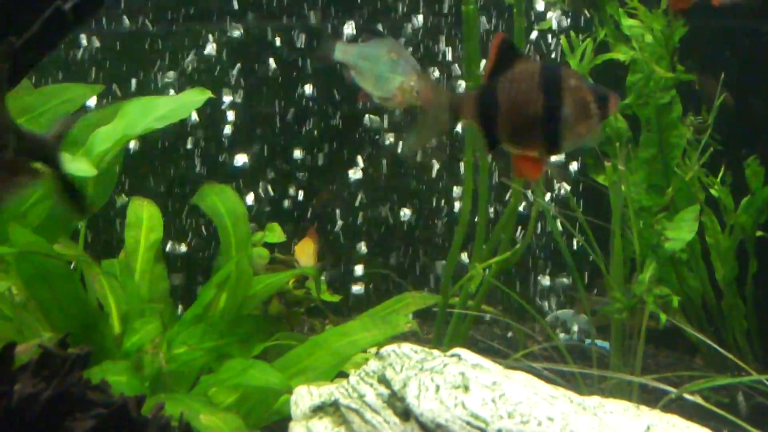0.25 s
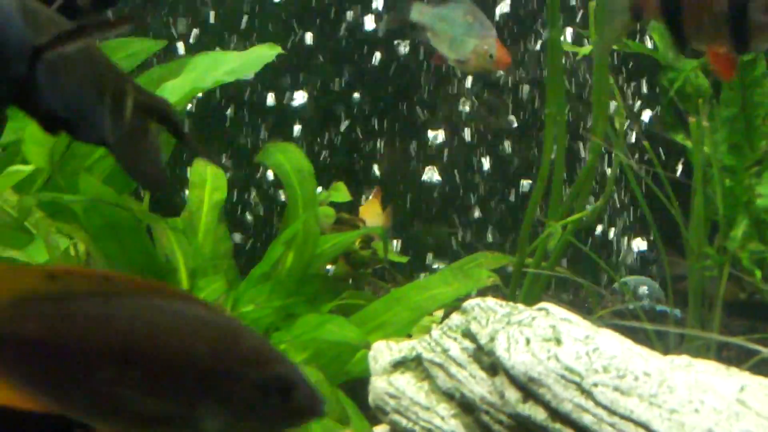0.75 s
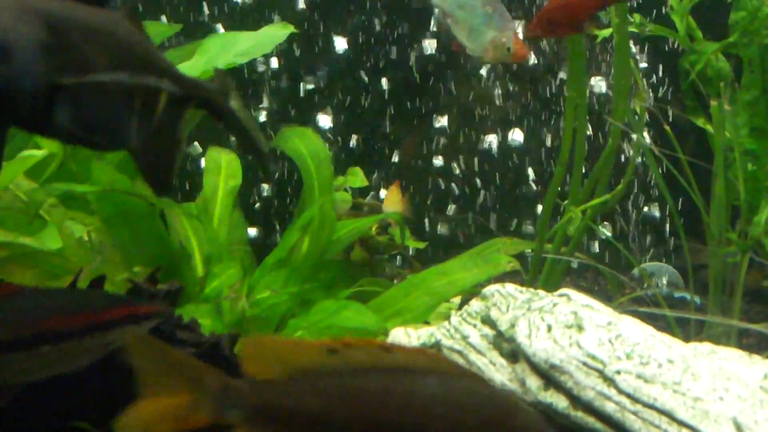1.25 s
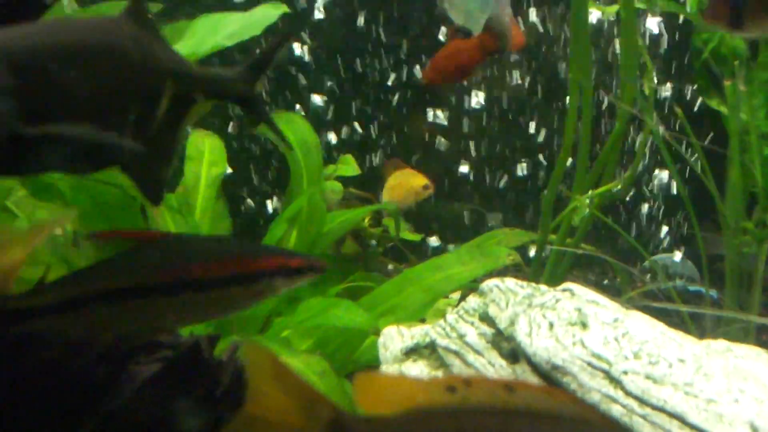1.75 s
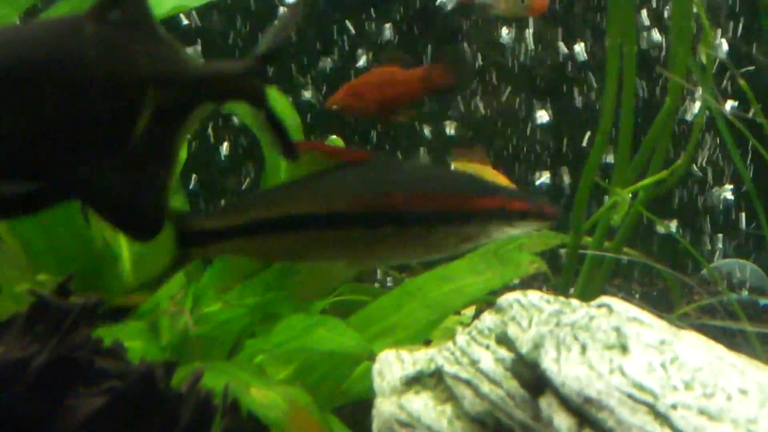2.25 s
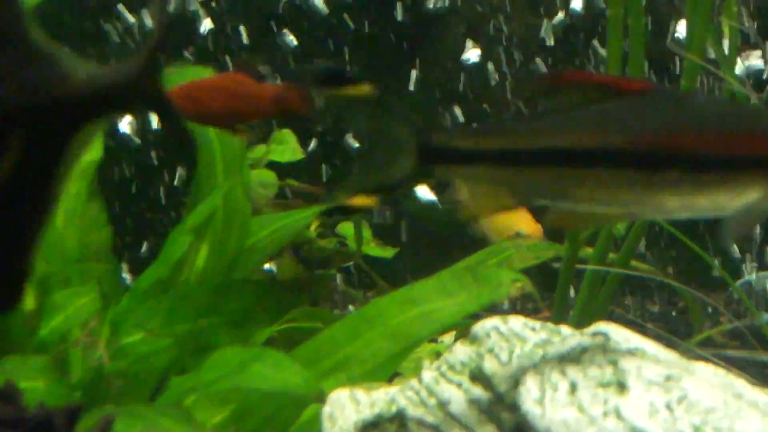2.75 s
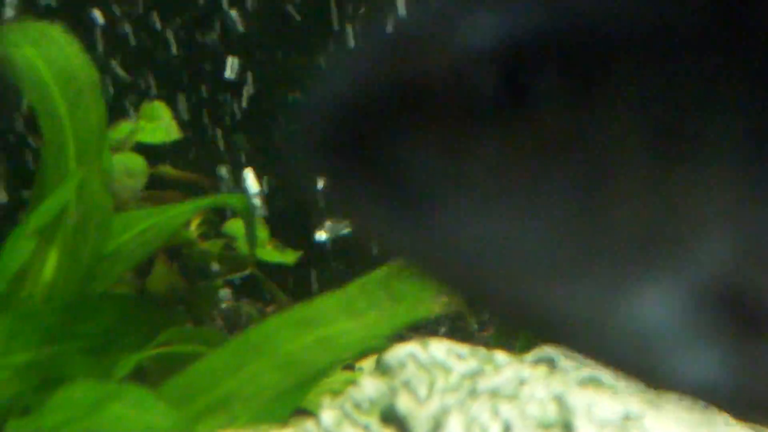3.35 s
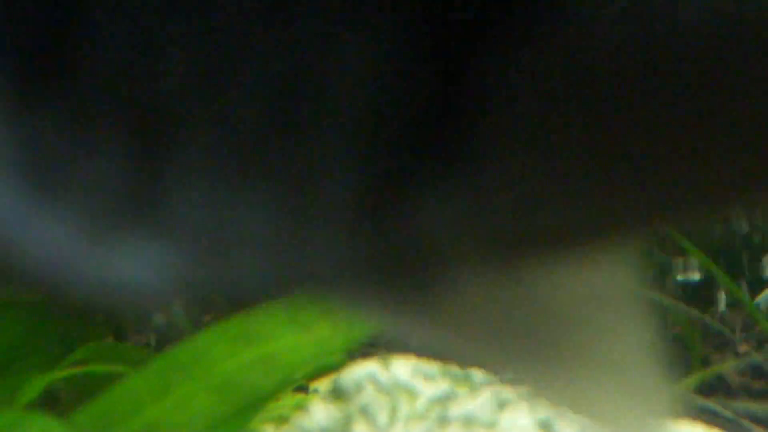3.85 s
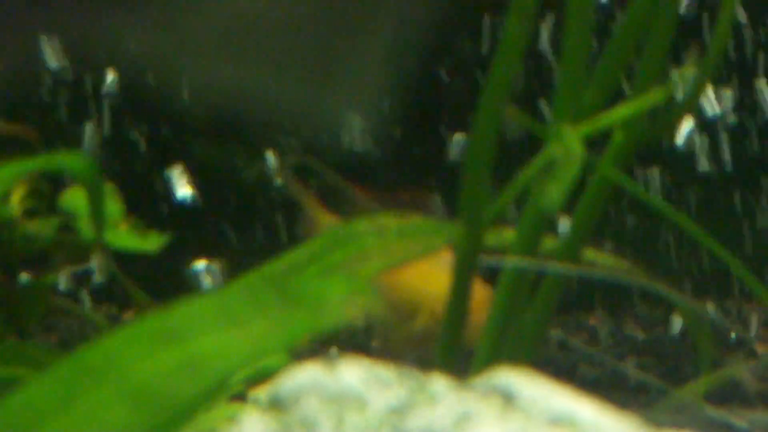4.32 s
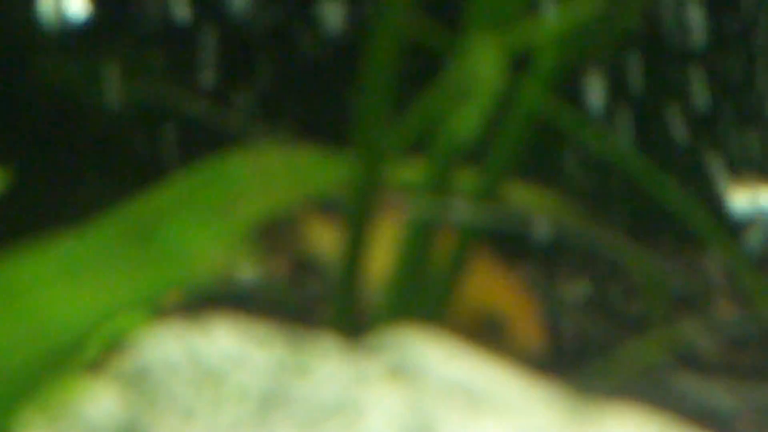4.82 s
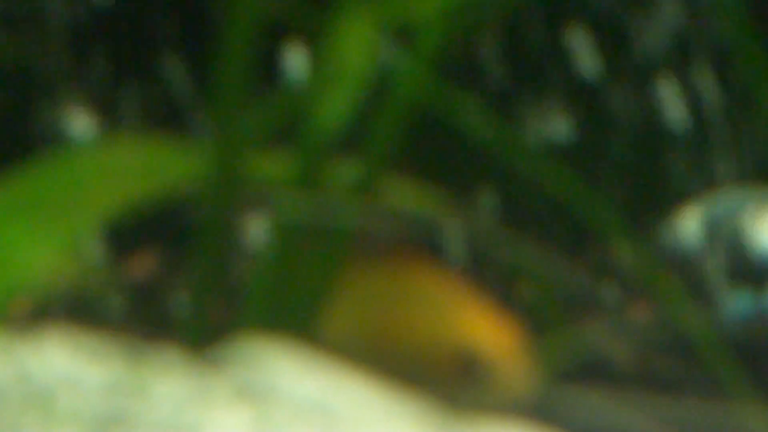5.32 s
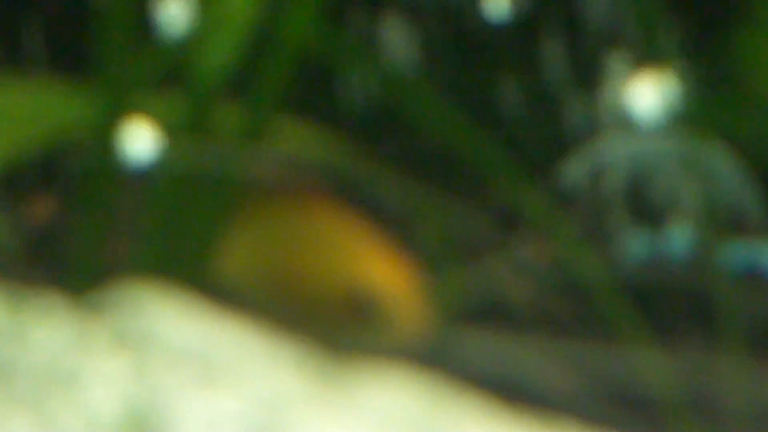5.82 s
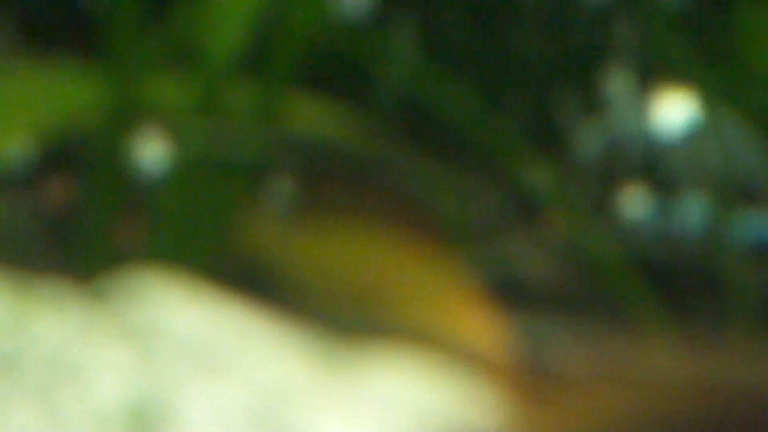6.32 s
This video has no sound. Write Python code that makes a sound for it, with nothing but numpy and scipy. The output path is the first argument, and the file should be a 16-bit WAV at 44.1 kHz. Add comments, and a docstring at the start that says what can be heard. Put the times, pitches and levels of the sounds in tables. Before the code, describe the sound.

Throughout, a curtain of bubbles in a home fish tank makes a soft, dense mid-low burble with light splashing, over a faint steady mains hum from the air pump and a quiet hiss, in a small room. At about 0.85 s a hard, bright plastic tap strikes the camera body, with tiny ticks around it. Smaller clicks follow from 1.1 to 1.3 s, then a cluster of ticks and short gritty finger rubs from 1.4 to 1.6 s. At 1.73 s the zoom motor starts with a jolt, whirring fast and quickly settling to a lower, grainy buzz that slowly grows. A bubble pops out at 3.2 s; a rounder gurgle swells around 4.6 s, with faint ticks just before. At 5.12 s the lever snaps back, by far the loudest sound, and the motor stops at 5.25 s. Bubbling and occasional plops remain, with a click near 6.5 s.

```python
"""A curtain of bubbles burbles in a home fish tank over the hum of its air pump, in a small room.
Fingers tick and rub on the camera; its zoom motor whirrs, and stops just after the lever snaps back loudly.
Bubbles are decaying rising tones amid shaped noise; the pump is a stack of mains multiples with glass noise.
Blows, rubs and gear knocks excite resonances of the camera shell.
The camera adds a quiet hiss with soft swells and cuts notches in the treble."""
import sys
import numpy as np
from scipy import signal
from scipy.fft import rfft, irfft, next_fast_len
from scipy.io import wavfile
from scipy.ndimage import uniform_filter1d, map_coordinates

SR = 44100
rng = np.random.default_rng(int(sys.argv[2]) if len(sys.argv) > 2 else 0)


def waveform_to_disk(signal):
    """Save audio, clipped to [-1, 1], as 16-bit WAV at the path in sys.argv[1]."""
    frames = np.transpose(np.atleast_2d(signal))
    scaled = np.clip(frames, -1, 1) * 32767
    samples = np.round(scaled).astype(np.int16)
    wavfile.write(sys.argv[1], SR, samples)


N = 290178

# camera shell when struck or rubbed, two low modes first: f/Hz, width/Hz, left level/dB, right level/dB
SHELL_MODES = [(1356, 133, -7.5, 5), (1400, 20, -14, -7), (1855, 270, 0, -2), (2108, 182, 3.5, 9),
               (2378, 254, -5, 3.5), (3480, 340, -29.5, -8.5)]


def amp(db):
    """Decibels to gain."""
    return 10 ** (np.asarray(db) / 20)


def unit(x):
    """Scale to rms 1."""
    return x / np.sqrt(np.mean(x ** 2) + 1e-20)


def along(points, hz):
    """Read a curve of (f/Hz, value) points on a log frequency axis."""
    f, v = np.transpose(points)
    return np.interp(np.log(hz + 1), np.log(f + 1), v)


def curves(rows):
    """One value per sample for each column after the time."""
    s, *columns = np.transpose(rows)
    return [np.interp(np.arange(N) / SR, s, column) for column in columns]


def wobble(rate):
    """A smooth random curve, rate knots a second."""
    knots = rng.standard_normal(int(N * rate / SR) + 4)
    return map_coordinates(knots, [np.arange(N) * rate / SR])


def filtered(x, response):
    """Filter x by a complex response of frequency."""
    m = next_fast_len(N + SR // 2)
    spectrum = rfft(x, m) * response(np.fft.rfftfreq(m, 1 / SR))
    return irfft(spectrum, m)[..., :N]


def body(modes, f):
    """Causal response of (f/Hz, width/Hz, level/dB) resonances, alternating in sign."""
    total = 0
    for k, (centre, width, db) in enumerate(modes):
        damping = 1j * f * width
        total = total + (-1) ** k * amp(db) * damping / (centre * centre - f * f + damping)
    return total


def shell(modes, f):
    """Resonances as the left and the right port hear them."""
    return np.array([body([(hz, width, sides[k]) for hz, width, *sides in modes], f) for k in range(2)])


def ports(x, pan_db):
    """Sound in the shell reaches the left port first; pan_db is left minus right."""
    lead_s = .000085
    sides = np.array([[.5], [-.5]])
    f = np.fft.rfftfreq(x.shape[-1], 1 / SR)
    delay = np.exp(2j * np.pi * f * sides * lead_s)
    return unit(amp(pan_db * sides)) * irfft(rfft(x) * delay, x.shape[-1])


def add(track, s, sound):
    """Mix a sound in at time s."""
    part = track[..., max(round(s * SR), 0):][..., :sound.shape[-1]]
    part += sound[..., :part.shape[-1]]


def diffuse(pair, colour):
    """Spread two unrelated signals as a room sound of rms 1, its sides far less alike in the treble."""
    # left-right likeness of the room sound: f/Hz, correlation (0 to 1)
    likeness = [(60, 0.54), (150, 0.34), (300, 0.44), (700, 0.67), (1400, 0.077), (3000, 0.065),
                (8000, 0.16)]

    def mid_side(f):
        turn = np.arccos(np.clip(along(likeness, f), -1, 1)) / 2
        return colour(f) * np.array([np.cos(turn), np.sin(turn)])

    mid, side = filtered(pair, mid_side)
    return unit(np.array([mid + side, mid - side]))


def rush(spectrum):
    """Stereo noise of rms 1, coloured by (f/Hz, level/dB) points."""
    return diffuse(rng.standard_normal((2, N)), lambda f: amp(along(spectrum, f)))


def room(x, t60):
    """Scatter a mono sound in a room of decay time t60 (s), differently to each port."""
    t = np.arange(SR // 2) / SR
    tail = rng.standard_normal((2, len(t))) * amp(-60 * t / t60)
    return signal.fftconvolve(x[None], tail / np.linalg.norm(tail[0]), axes=1)[:, :N]


def hiss():
    """A quiet hiss wavers a little and now and then swells in a narrow band."""
    # colour of the hiss: f/Hz, relative level/dB
    hiss_colour = [(500, -8.5), (3000, -15), (6300, 2), (9000, 4.5), (11000, 2), (15500, -35.5)]
    # soft swells: middle t/s, spread/s, f/Hz, level/dB
    swells = [(0.125, .03, 3750, -67), (0.345, 0.024, 5950, -63), (0.68, .07, 6600, -65.5),
              (3.035, .025, 3600, -62), (3.243, .008, 4150, -57), (3.66, 0.011, 6180, -58),
              (3.912, .012, 10900, -59)]
    swell_width_hz = 450
    size = SR // 2
    f = np.fft.rfftfreq(size, 1 / SR)
    t = (np.arange(size) - size // 2) / SR
    track = amp(-63.5 + .4 * wobble(8)) * rush(hiss_colour)
    for s, spread_s, hz, db in swells:
        noise = rfft(rng.standard_normal((2, size)))
        band = unit(irfft(noise * body([(hz, swell_width_hz, 0)], f) ** 2, size))
        add(track, s + t[0], amp(db) * np.exp(-.5 * (t / spread_s) ** 2) * band)
    return track


def pump():
    """The diaphragm buzzes at multiples of the mains; noise sounds the tank's glass and hood modes."""
    # pump hum: multiple of the mains, relative level/dB
    hum_partials = [(1, -15), (2, -20.5), (3, -11), (4, 0), (5, -13.5), (6, -10), (8, -12.5), (10, -14)]
    # glass and hood: f/Hz, width/Hz, relative level/dB
    tank_modes = [(453.7, 24, -1.5), (485.4, 10, 1), (905.6, 12, 0.5), (1385, 25, -8)]
    mains_hz = 60
    phase = 2 * np.pi * mains_hz * np.arange(N) / SR
    hum = np.zeros(N)
    for multiple, db in hum_partials:
        level = amp(db + 1.2 * wobble(11))
        drift = 2 * np.pi * rng.random() + 0.073 * wobble(4.5)
        hum += level * np.sin(round(multiple) * phase + drift)
    glass = diffuse(rng.standard_normal((2, N)), lambda f: body(tank_modes, f))
    # the hum leans slightly to the left
    return amp(-51.5) * unit(hum) * amp([[.6], [-.6]]) + amp(-56.0) * glass


def bubble(hz, cycles, rise=0.075):
    """A bubble rings, fading by 1/e in the given cycles, and rises in pitch as it surfaces."""
    t = np.arange(SR // 20) / SR
    age = hz * t / cycles
    return np.sin(2 * np.pi * hz * t * (1 + rise * (1 - np.exp(-age)))) * np.exp(-age)


def swarm(centre_hz, spread, cycles, size_db, count):
    """Many bubbles of random moment, pitch and size."""
    when, size = rng.random(count), rng.exponential(size=count)
    hz = np.clip(centre_hz * np.exp(spread * rng.standard_normal((count, 1))), 200, SR / 3)
    rings = bubble(hz, cycles) * amp(size_db * np.minimum(size, 4))[:, None]
    at = (when * N).astype(int)[:, None] + np.arange(rings.shape[1])
    return np.bincount(at.ravel(), rings.ravel())[:N]


def water():
    """Big bubbles burble, small ones burst at the surface; the room blurs both into a wash."""
    # strength of the air flow, the reference for both layers: t/s, level/dB
    flow = [(0.0, -54.5), (2.67, -54), (3.45, -52), (4.49, -52), (4.62, -51.5), (6.58, -53)]
    # colour of the burble: f/Hz, relative level per Hz/dB
    burble_colour = [(25, 5.5), (60, -3.5), (110, -12.5), (160, -4.5), (260, 2.5), (400, -1.5), (650, 0.5),
                     (850, 0), (980, -3), (1400, -4), (2500, -27)]
    # colour of the splash: f/Hz, relative level per Hz/dB
    splash_colour = [(400, -51), (1000, 0), (1400, -6), (2000, -1), (2500, -7), (3300, -20), (6500, -11),
                     (11000, -28)]
    splash_follows = 0.51  # dB of splash for each dB of flow
    flow_db, = curves(flow)
    burble_db = 4 + flow_db
    splash_db = -1 + flow_db.mean() + splash_follows * (flow_db - flow_db.mean())
    big = room(swarm(centre_hz=782.0, spread=0.36, cycles=13.4, size_db=3.5, count=1500), t60=0.32)
    small = room(swarm(centre_hz=1920, spread=.45, cycles=16.0, size_db=3, count=2500), t60=0.077)
    # the single bubbles take half of each colour, in dB
    big_wash = diffuse(big, lambda f: amp(along(burble_colour, f) / 2))
    small_wash = diffuse(small, lambda f: amp(along(splash_colour, f) / 2))
    burble = 0.83 * rush(burble_colour) + 0.33 * big_wash
    splash = 0.57 * rush(splash_colour) + 0.43 * small_wash
    return amp(burble_db + 0.68 * wobble(9)) * burble + amp(splash_db + 2.5 * wobble(5.8)) * splash


def gurgle():
    """For a while a stream of like-sized bubbles gurgles over the rest."""
    # gurgling stream: t/s, level/dB
    gurgle_level = [(3.4, -71), (4.2, -65), (4.65, -53.5), (5.4, -58.5), (6.58, -68)]
    level_db, = curves(gurgle_level)
    stream = room(swarm(centre_hz=731, spread=0.1, cycles=13.3, size_db=2.0, count=900), t60=0.2)
    return amp(level_db) * diffuse(stream, lambda f: 1)


def plops():
    """Single larger or nearer bubbles ring out, heard directly and through the room."""
    # bubbles that stand out: t/s, starting f/Hz, relative level/dB, cycles of ringing
    single_bubbles = [(3.24, 1410, -34, 9), (4.63, 720, -37, 14), (4.835, 1140, -35.5, 14),
                      (5.522, 2530, -46, 36), (5.739, 783, -33, 6), (6.224, 486, -33, 8.3)]
    track = np.zeros(N)
    for s, hz, db, cycles in single_bubbles:
        add(track, s, amp(db) * bubble(hz, cycles, rise=0.018))
    return amp(-6.5) * track + amp(-14.5) * room(track, t60=0.28)


def rubs():
    """Skin catches and slips on the case: a short gritty scrape through the shell's resonances."""
    # a finger slides on the case: start t/s, end t/s, relative level/dB
    slides = [(0.871, 0.889, -66), (1.399, 1.408, -59), (1.445, 1.454, -54), (1.486, 1.522, -55.5),
              (1.555, 1.569, -54)]
    # the shell's dull note under the finger: f/Hz, width/Hz, relative level/dB
    dull_note = [(890, 490, 9.5)]
    t = np.arange(N) / SR
    press = sum(amp(db) * ((t > start) & (t < end)) for start, end, db in slides)
    grit = unit(rng.standard_normal(N) * amp(1.7 * wobble(600)))
    scrape = grit * uniform_filter1d(press, size=90)

    def colour(f):
        bright = body([(7700, 4600, 0)], f)
        return shell(SHELL_MODES, f) + amp(-3.5) * body(dull_note, f) + amp(1.0) * bright

    return amp(16.5) * ports(filtered(scrape, colour), pan_db=-14.0)


def peaked(spectrum):
    """The wave of a spectrum, with a peak of 1."""
    wave = irfft(spectrum)
    return wave / np.abs(wave).max()


def contacts(blows, tick_t60, grit, room_db):
    """Each blow rings the shell around its own pitch and in two low modes, with a crackling tick and a thud."""
    # colour of a blow's tick: f/Hz, relative level/dB
    tick_colour = [(2500, -33.5), (3500, 6.5), (4600, -0.5), (6200, 6.5), (7500, -1.5), (8800, -1),
                   (10500, 0), (15500, -3.5)]
    ring_width_hz, tick_width_hz = 810, 6650
    thud_width, thud_top_hz = 1.4, 1300  # width over pitch; the soft fingertip gives little higher up
    size = 8192
    f = np.fft.rfftfreq(size, 1 / SR)
    t = (np.arange(size) - size // 16) / SR
    blow = rfft(t == 0)
    low = peaked(blow * shell(SHELL_MODES[:2], f))
    upper = shell(SHELL_MODES[2:], f)
    track = np.zeros((2, N))
    for s, db, ring_hz, low_db, tick_db, thud_db, tick_hz, thud_hz in blows:
        crackle = rng.standard_normal((2, size)) * (t >= 0) * amp(-60 * np.abs(t) / tick_t60)
        snap = blow + grit * rfft(crackle)
        ring = peaked(blow * upper * body([(ring_hz, ring_width_hz, 0)], f)) + amp(low_db) * low
        tick_band = amp(along(tick_colour, f)) * body([(tick_hz, tick_width_hz, 0)], f) ** 2
        tick = amp(tick_db) * peaked(snap * tick_band)
        thud_band = body([(thud_hz, thud_width * thud_hz, 0)], f) ** 2 / (1 + 1j * f / thud_top_hz)
        thud = amp(thud_db) * peaked(blow * thud_band)
        sound = ports(ring, pan_db=0) + ports(thud, pan_db=-8) + ports(tick, pan_db=-2.0)
        add(track, s + t[0], amp(db) * sound)
    return track + amp(room_db) * room(track.mean(0), t60=0.15)


def clicks():
    """Fingers tap the case and its buttons."""
    # taps: t/s, ring level/dB, ring f/Hz, then low modes, tick and thud over the ring/dB,
    # tick f/Hz, thud f/Hz
    taps = [(0.8277, -31, 1450.0, -3, 4.5, -19.0, 7100.0, 970.0),
            (0.8472, -27, 2300.0, 2, 1, -12, 5200.0, 1120.0),
            (0.8528, -8, 2380.0, -7, -0.5, -29, 5400.0, 900.0),
            (0.876, -27.7, 2470.0, -13.0, -6.0, -19.0, 6400.0, 580.0),
            (0.883, -32, 2310.0, 2, 10.0, -10, 8000.0, 1000.0),
            (0.89, -30, 2060.0, -4, -15.0, -23.0, 7200.0, 870.0),
            (1.119, -38.5, 2460.0, -12.0, -2.0, -21.0, 5300.0, 740.0),
            (1.1762, -37, 1540.0, 5, -7.0, -4.0, 7900.0, 890.0),
            (1.2049, -20, 1740, 4, 11.5, -11, 8700, 1250.0),
            (1.248, -41.5, 2420.0, 0.0, 4, -20.0, 6400.0, 760.0),
            (1.291, -28, 1450.0, 0.5, -14.0, -19.0, 7800.0, 1000.0),
            (1.4427, -22.5, 1830.0, -3, -3, -8.5, 8900.0, 710.0),
            (1.4888, -21, 1450.0, -2.5, -4, -6, 9100.0, 740.0),
            (1.5556, -23, 1450.0, -3, -4, -1.5, 9500.0, 890.0),
            (1.572, -28, 2500.0, -13.0, 2, -10, 7600.0, 1150.0),
            (1.5992, -17, 2120.0, -0.5, -5, -7.5, 5400.0, 990.0),
            (1.7271, -22.5, 2360.0, -5.5, -23.0, -33, 7700.0, 800.0),
            (4.5172, -34.5, 2600, 3.0, 8.0, 0, 7400, 1060.0),
            (4.576, -28.5, 1500.0, 1.5, -19.0, -14, 7900.0, 910.0),
            (6.4867, -22, 1450.0, -7.5, -1.5, -15, 7200.0, 1130.0)]
    return contacts(taps, tick_t60=0.007, grit=.65, room_db=-30)


def knocks(turns, size_db):
    """One knock at each whole turn; play in the gears scatters its moment and strength."""
    play_s = .00017
    marks = np.arange(1, turns[-1])
    late, size = rng.standard_normal((2, 1024))[:, :len(marks)]
    at = np.searchsorted(turns, marks) + np.round(play_s * SR * late).astype(int)
    return unit(np.bincount(at, amp(size_db * size), N))


def zoom_motor():
    """The gear knocks each turn, softer half-way, over a faster pinion; it starts fast, then settles."""
    # camera shell shaken by the motor: f/Hz, width/Hz, relative left level/dB, relative right level/dB
    motor_modes = [(1380, 35, -43, 9.5), (2068, 180, -1, 9.5), (2393, 257, -9.5, 12), (2522, 306, -19, 8),
                   (3100, 1570, -18, -7.5), (6330, 360, -3.5, -7.5), (8300, 2800, -22.5, -22)]
    start_s, stop_s = 1.727, 5.252
    fast_hz, cruise_hz = 156.9, 90.7  # gear turns a second, at first and once settled
    fast_s, settle_s = .13, .07  # how long it runs fast; time constant of its slowing
    cruise_db, fast_db, creep_db_per_s = -51.5, 2.5, 0.63  # the level creeps up as the lens travels
    jolt_db, brake_db, jolt_s = 6.5, 2.5, 0.018  # jolts through the gears' slack on start and stop
    pinion_ratio = 1.66
    t = np.arange(N) / SR
    running = (t > start_s) & (t < stop_s)
    age = np.maximum(t - start_s, 0)
    haste = np.exp(-np.maximum(age - fast_s, 0) / settle_s)
    rate = (cruise_hz + (fast_hz - cruise_hz) * haste) * (1 + .012 * wobble(14))
    jolts = jolt_db * np.exp(-age / jolt_s) + brake_db * np.exp(-np.abs(t - stop_s) / jolt_s)
    db = cruise_db + fast_db * haste + creep_db_per_s * age + jolts
    turns = np.cumsum(rate * running) / SR
    gears = knocks(turns, size_db=1.2) + 0.45 * knocks(turns + .5, size_db=1.5)
    gears = gears + 0.5 * knocks(pinion_ratio * turns, size_db=1.5)
    friction = running * rng.standard_normal(N) * (1 + .5 * np.cos(2 * np.pi * turns))
    force = unit(gears) + 0.4 * unit(friction)
    heard = ports(filtered(force, lambda f: shell(motor_modes, f)), pan_db=1.5)
    # the root makes the level count over the running time only
    return amp(db) * unit(heard) * np.sqrt(running.mean())


def lever():
    """The zoom lever slips, hits its stop and rebounds in a quick run of blows."""
    # blows: t/s, ring level/dB, ring f/Hz, then low modes, tick and thud over the ring/dB,
    # tick f/Hz, thud f/Hz
    lever_blows = [(5.1153, -20, 2000, -4.5, -5.5, -19.5, 7000, 800),
                   (5.1163, 4, 1900, -11.5, 3.5, -30.5, 8100, 900),
                   (5.1170, 2.5, 1850, -19.5, 4.5, -28, 5940, 850),
                   (5.1186, -6, 2220, -3, 1, -22, 6800, 800)]
    return contacts(lever_blows, tick_t60=0.007, grit=0.65, room_db=-26)


def scene():
    """The tank in front of the camera, and the camera's own noises."""
    tank = pump() + water() + gurgle() + plops()
    return tank + zoom_motor() + clicks() + lever() + rubs() + hiss()


def record(dry):
    """The camera notches its treble, clips at full scale, then cuts the rumble and the extreme treble."""
    # treble notches: f/Hz, width/Hz
    treble_notches = [(3000, 720), (4000, 1540), (5000, 1040), (12400, 10400), (13300, 7100)]
    top_hz = 16300

    def notch(f):
        gaps = [(c * c - f * f) / (c * c - f * f + 1j * f * w) for c, w in treble_notches]
        return np.prod(gaps, axis=0)

    notched = filtered(dry, notch)
    low_cut = signal.butter(3, 130, "highpass", fs=SR, output="sos")
    lean = signal.sosfilt(low_cut, np.clip(notched, -1, 1))
    return filtered(lean, lambda f: 1 / (1 + (f / top_hz) ** 70))


dry = scene()
out = record(dry)
waveform_to_disk(out)
```